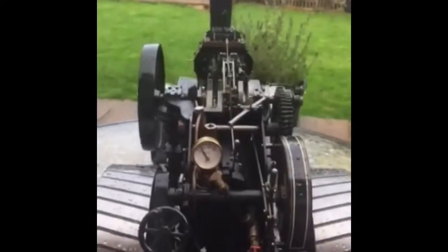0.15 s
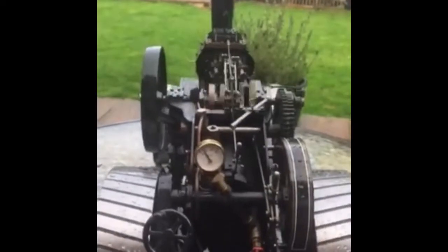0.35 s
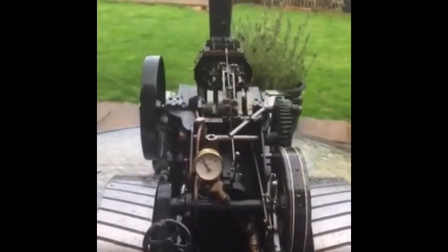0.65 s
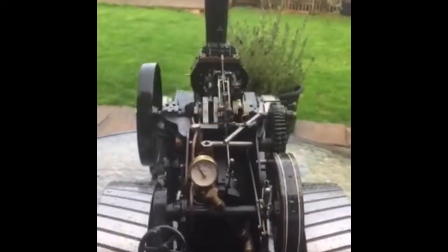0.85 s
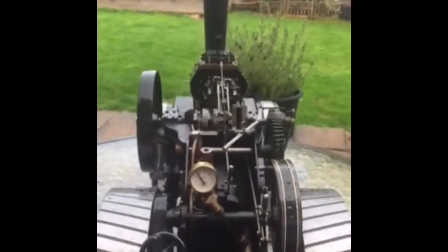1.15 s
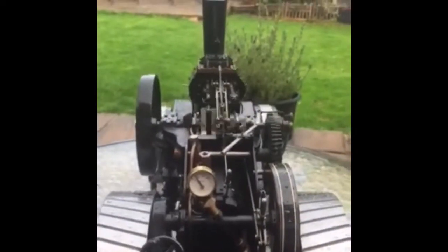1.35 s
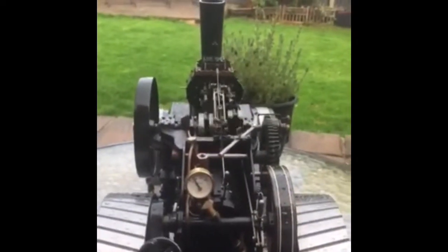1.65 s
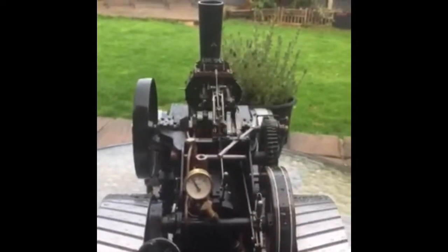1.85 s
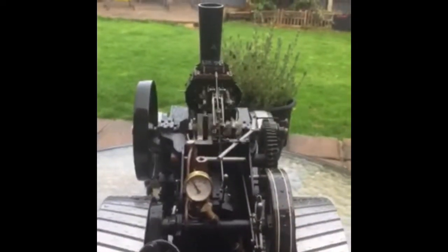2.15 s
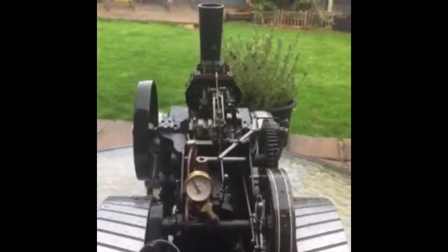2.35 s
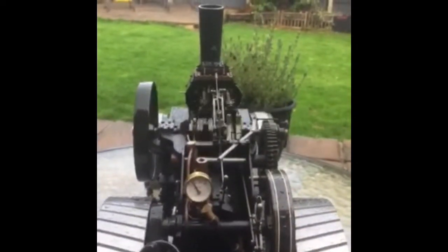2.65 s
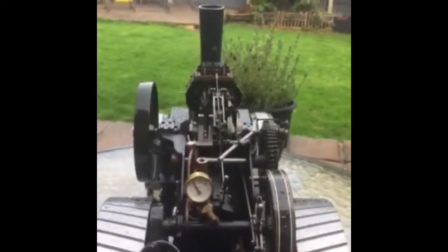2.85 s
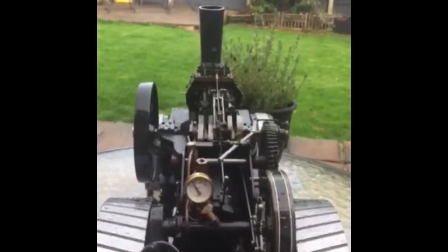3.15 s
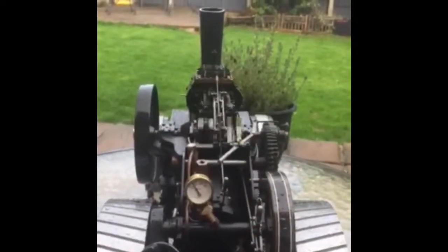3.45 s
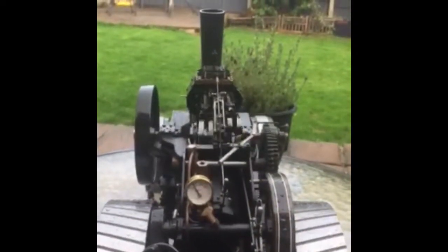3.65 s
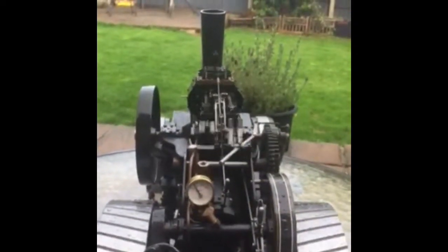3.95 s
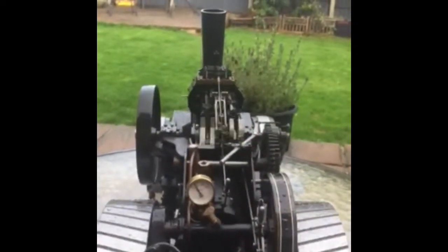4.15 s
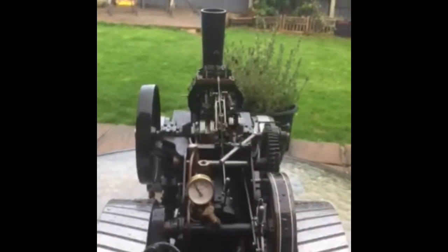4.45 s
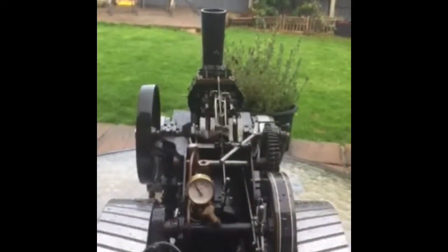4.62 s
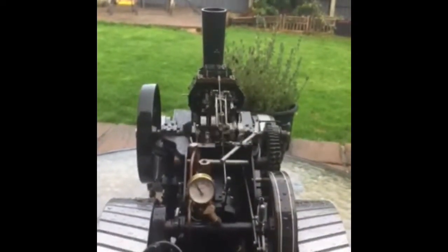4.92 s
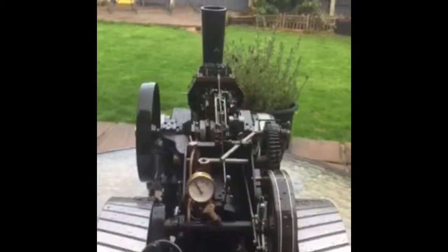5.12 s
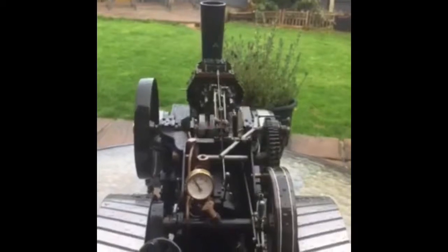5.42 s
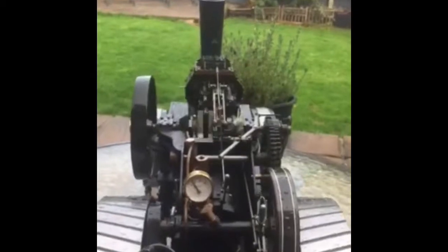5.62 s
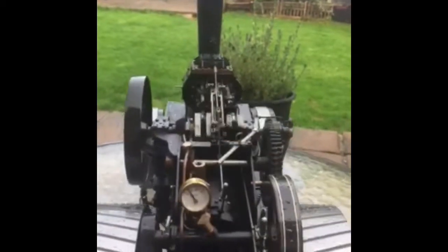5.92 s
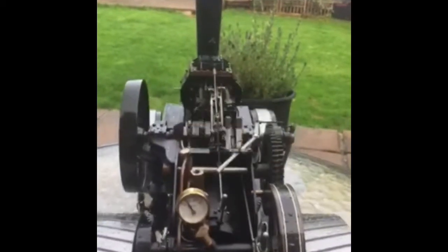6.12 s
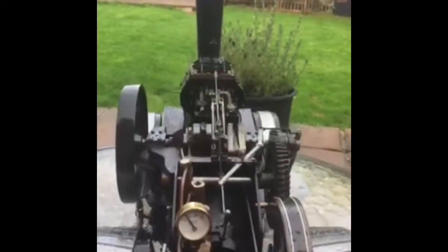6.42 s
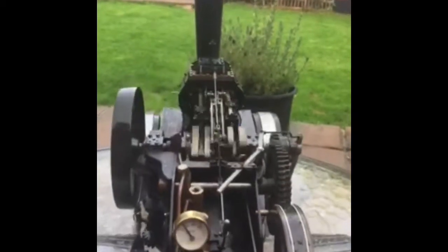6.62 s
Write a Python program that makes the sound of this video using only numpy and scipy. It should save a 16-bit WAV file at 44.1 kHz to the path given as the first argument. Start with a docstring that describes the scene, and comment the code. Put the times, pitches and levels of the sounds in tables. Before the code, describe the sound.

A small live-steam engine ticks over outdoors, hissing and knocking almost four times a second, then steam rushes out louder and slowly eases.

```python
"""A model traction engine ticks over on a garden table, close to a mono microphone.
Throughout: noise puffs in chimney resonances, a struck-mode knock per turn, rubbed frame, hiss, sizzle.
From the start: a swelling sine drone, soft low bumps and spits of hot water (snap, fizz, short rings).
0.77 s: the steam valve lifts briefly; 0.93 s: again, and the resonant noise jet slowly eases.
From 2.2 s: loose gear rattles as filtered clicks; from 2.8 s: three short spurts of wet steam."""
import sys
import numpy as np
from scipy import signal
from scipy.fft import rfft, irfft
from scipy.io import wavfile

SR = 44100
rng = np.random.default_rng(int(sys.argv[2]) if len(sys.argv) > 2 else 0)


def dump_mix(stems):
    """Bounce the given channels to the path in sys.argv[1] as a 16-bit WAV at rate SR."""
    frames = np.atleast_2d(stems).T  # one column per channel
    limited = np.clip(frames, -1, 1)  # hard clip at full scale
    pcm = np.round(limited * 32767).astype(np.int16)
    wavfile.write(sys.argv[1], SR, pcm)


N = 298998
TIME_S = np.arange(N) / SR
FREQ_HZ = np.fft.rfftfreq(N, 1 / SR)
BURST_N = SR // 5  # samples in a short sound

# crank, near 3.7 turns/s with two brief spurts of speed; knocks at whole turns: t/s, angle/turns
CRANK = [(0, .49), (.414, 2), (.98, 4), (1.229, 5), (2.022, 8), (3.398, 13), (3.874, 15), (4.943, 19),
         (6.037, 23), (6.78, 25.67)]
# exhaust puffs in each turn: place after knock/turns, width/turns, relative level/dB
PUFFS = [(0.15, 0.071, -9), (0.55, 0.039, -6), (0.88, 0.058, -4), (0.013, 0.022, -6.5)]
# chimney air column: f/Hz, width/Hz, relative level/dB
CHIMNEY = [(153.1, 9.2, 4), (175.6, 19, -9), (196, 21, -25.5)]
# knock modes: nominal f/Hz, t60/s, relative level/dB
KNOCK_MODES = [(322.8, 0.13, -2.5), (376, 0.02, 1.5), (422, 0.04, -22), (552, 0.097, -13.5)]
# sliding of crosshead and valve gear: place after knock/turns, width/turns, relative level/dB
SLIDES = [(.09, 0.13, -1.5), (.4, 0.052, -5.5), (0.521, 0.029, 1), (0.821, 0.033, 3.5), (.94, 0.041, -9)]
# frame and boiler shell: f/Hz, width/Hz, relative level/dB
FRAME = [(251, 16, -2.5), (323, 21, 7), (362, 47, 1), (429.3, 17.4, 2.5), (578, 25, -7.5), (710, 210, -13),
         (931, 49, -3), (974, 75, -5), (1140, 390, -11)]
# rods singing on every turn: place after knock/turns, width/turns, f/Hz, level/dB
SINGS = [(0.887, 0.086, 574, -55), (0.035, 0.029, 574, -53.5), (0.079, 0.077, 824, -56.5)]
# loose gear: t/s, blow level before colouring/dB
RATTLES = [(2.194, -5), (2.705, -7), (4.539, -3), (4.792, 0.5), (4.843, -1), (5.596, 2.5), (5.936, -4),
           (6.035, 0), (6.045, -1), (6.051, 1), (6.058, -2), (6.303, 3.5), (6.431, -2.5)]
# rattle spectrum: f/Hz, relative density level/dB
RATTLE_COLOUR = [(90, -13), (200, -4.5), (420, -16), (560, -4.5), (720, 1), (900, -10.5), (1300, -6),
                 (2500, -16), (6000, -19), (14000, -45)]
# valve lifts: t/s, rush rise/dB, attack/s, release time constant/s
LIFTS = [(0.77, 9.5, 0.037, 0.12), (0.93, 11, 0.038, 2.78)]
# jet's hollow tone, also drives the chimney hum: t/s, level before trim/dB
TONE_LEVEL = [(0.0, -45.5), (0.47, -42), (0.75, -46.5), (0.81, -37), (0.92, -45.5), (0.96, -29.5),
              (1.02, -41), (1.09, -32), (1.17, -39), (1.85, -36), (1.87, -28), (1.93, -35.5), (3.12, -39),
              (3.7, -36.5), (3.78, -47), (3.83, -39), (6.7, -49), (6.78, -45)]
# hollow tone in the chimney mouth: f/Hz, width/Hz, relative level/dB
JET_TONE = [(1153, 57, -23), (1246, 140, -8.5), (1329, 34, -1.5), (1357.5, 41, 0.5), (1410, 46, -8.5)]
# higher jet resonances: f/Hz, width/Hz, relative level/dB
JET_MODES = [(1750, 84, -12), (1924, 264, -6.5), (2530, 11, 3.5), (2655, 118, 3), (2864, 335, -2.5),
             (3170, 450, -11), (3585, 130, -6.5), (3767, 176, 0.5), (4350, 190, -8), (5450, 270, -9.5),
             (6700, 1400, -17.5)]
# sizzle at glands and drain cocks: f/Hz, width/Hz, relative level/dB
SIZZLE = [(4230, 300, 2.5), (5470, 240, 5), (5850, 180, 3.5), (6430, 220, 3.5), (7060, 410, 3),
          (8130, 290, 2), (8530, 490, -1), (9600, 810, -2), (11000, 420, 2), (11970, 580, -0.5),
          (13200, 700, -5), (15300, 700, -5.5)]
# steam leak and garden air: f/Hz, relative density level/dB
HISS = [(25, -34), (60, 3), (110, 6.5), (230, 4), (400, 9), (520, 1), (700, 1), (1050, 0.5), (1650, -3),
        (4800, -0.5), (7700, -5), (9000, -1.5), (14000, -4.5), (15500, -2)]
# hot-water spits: t/s, level before high-pass/dB, low ring f/Hz, high ring f/Hz,
# high ring relative level/dB, snap relative level/dB, ring t60/s
SPITS = [(0.126, -32, 2500, 2900, -8, -30, .008), (0.2863, -27.5, 2270, 2600, -15, -22, .009),
         (0.5954, -27.5, 4470, 11800, 3, 13, 0.007), (0.7768, -24.5, 1360, 3750, -1, 1, 0.009),
         (4.8327, -9.5, 3230, 9000, -5, -19, 0.0029), (5.539, -8.5, 3500, 5950, -5, 9, 0.0034),
         (6.174, -30, 2690, 2850, -18, -17, 0.025)]
# wet-steam spurts: t/s, peak level/dB, f/Hz, bell width (sigma)/s
SPURTS = [(2.829, -34, 6200, 0.0027), (2.845, -45, 6260, .014), (3.327, -42, 6200, 0.0043)]
# drone: t/s, level before trim/dB
DRONE_LEVEL = [(0.0, -67), (0.19, -74), (0.55, -52), (0.79, -62), (0.87, -52), (1.34, -49.5), (1.6, -61),
               (1.91, -49.5), (3.25, -70), (3.63, -52), (4.12, -48), (4.27, -57), (4.49, -45),
               (5.38, -42.5), (5.91, -54), (6.14, -43.5), (6.78, -39)]
# low bumps on the microphone: t/s, peak level/dB, f/Hz, bell width (sigma)/s
BUMPS = [(0.018, -44, 178, .014), (0.347, -43, 140, 0.011), (.36, -46, 60, 0.019), (1.054, -51, 60, .02),
         (1.457, -50, 55, .018), (2.54, -48, 58, 0.034), (6.047, -39.5, 190, 0.014)]

# the pull holds the bearing tight: softer knock per turn/s above idle
IDLE_TURNS_PER_S, KNOCK_DB, KNOCK_SOFTEN_DB_PER_TURN_PER_S = 3.8, -29.5, 17
RUSH_SHUT_DB, HISS_DB = -47.5, -45
DRONE_START_HZ, DRONE_SAG_HZ_PER_S = 99.7, 0.58
TOP_HZ = 15700


def undb(db):
    """Decibels to gain."""
    return 10 ** (np.asarray(db) / 20)


def unit(x):
    """Scale to rms 1."""
    return x / np.sqrt(np.mean(x ** 2))


def noise():
    """White noise, full length."""
    return rng.standard_normal(N)


def curves(table):
    """Table columns interpolated linearly in time."""
    t_s, *columns = np.transpose(table)
    return [np.interp(TIME_S, t_s, column) for column in columns]


def walk(rate_hz):
    """Random levels joined by lines, rms 1."""
    points = rng.standard_normal(2048)
    return unit(np.interp(TIME_S * rate_hz, np.arange(len(points)), points))


def colour(x, points):
    """Minimum-phase filter with a (Hz, dB) outline, made by folding the cepstrum."""
    hz, db = np.transpose(points)
    outline_db = np.interp(np.log(FREQ_HZ + 1), np.log(hz), db)
    cepstrum = irfft(np.log(undb(outline_db)), N)
    cepstrum[1:N // 2] *= 2
    cepstrum[N // 2 + 1:] = 0
    return irfft(rfft(x) * np.exp(rfft(cepstrum)), N)


def resonate(x, modes, steep):
    """Zero-phase (Hz, width Hz, dB) resonances; steep sets how fast the skirts fall."""
    power = 0
    for hz, width_hz, db in modes:
        detune = (FREQ_HZ ** 2 - hz ** 2) / (width_hz * (FREQ_HZ + 1))
        power = power + undb(db) ** 2 / (1 + detune ** 2 / steep) ** steep
    return irfft(rfft(x) * np.sqrt(power), N)


def even_out(x, softness):
    """Divide a narrow band by its envelope for near-steady strength; rms 1."""
    envelope = np.abs(signal.hilbert(unit(x)))
    return unit(x / (envelope + softness))


def fade(t60_s):
    """Exponential decay over a fifth of a second."""
    return np.exp(-np.log(1000) * TIME_S[:BURST_N] / t60_s)


def ring(hz, t60_s):
    """One struck mode: a decaying sine."""
    return fade(t60_s) * np.sin(2 * np.pi * hz * TIME_S[:BURST_N])


def add(out, t_s, sound):
    """Mix a short sound in at t_s."""
    start = max(int(t_s * SR), 0)
    out[start:start + len(sound)] += sound[:max(N - start, 0)]


def strokes(angle, table, rest_db):
    """Gain bells at fixed crank angles on every turn, over a resting gain."""
    gain = undb(rest_db)
    for place, width, db in table:
        offset = (angle - place + 0.5) % 1 - 0.5
        gain = gain + undb(db) * np.exp(-0.5 * (offset / width) ** 2)
    return gain


def swells(table):
    """Brief bell-shaped swells of band noise, each around its own pitch."""
    out = np.zeros(N)
    for t_s, db, hz, sigma_s in table:
        bell = np.exp(-0.5 * ((TIME_S - t_s) / sigma_s) ** 2)
        band = resonate(noise(), [(hz, hz / 2, 0)], steep=1.5)
        out += undb(db) * bell * even_out(band, softness=0.87)
    return out


def crank_angle():
    """Turns of the crank, whole at each knock."""
    return curves(CRANK)[0]


def exhaust(angle, puff_db=-41, draught_db=-17.5):
    """Spent steam puffs sound the chimney's air column; the jet's draught keeps it humming between."""
    jet_db, = curves(TONE_LEVEL)
    air = even_out(resonate(noise(), CHIMNEY, steep=2.1), softness=0.32)
    puffs = undb(puff_db) * air * strokes(angle, PUFFS, rest_db=-24.5)
    hum = even_out(resonate(noise(), CHIMNEY[:1], steep=3.0), softness=0.68)
    return puffs + hum * undb(jet_db + draught_db)


def knocks(angle, lead_s=0.002, scatter_db=0.6, scatter_ratio=0.0098):
    """Big-end play is taken up once a turn with an oil-softened blow; quick turns knock more softly."""
    out = np.zeros(N)
    times_s = TIME_S[1:][np.diff(np.floor(angle)) > 0]
    turns_per_s = 1 / np.diff(times_s, prepend=-np.inf)
    excess = np.maximum(turns_per_s - IDLE_TURNS_PER_S, 0)
    levels_db = KNOCK_DB - KNOCK_SOFTEN_DB_PER_TURN_PER_S * excess
    for t_s, db in zip(times_s, levels_db):
        for k, (hz, t60_s, mode_db) in enumerate(KNOCK_MODES):
            level_chance, pitch_chance = rng.standard_normal(2)
            # alternate signs: the knock takes a cycle to build
            size = (-1) ** k * undb(db + mode_db + scatter_db * level_chance)
            add(out, t_s - lead_s, size * ring(hz * (1 + scatter_ratio * pitch_chance), t60_s))
    return out


def motion(angle, rub_db=-50.5):
    """Sliding rods and meshing gears rub the frame into sound; rods sing at their own crank angles."""
    rub = noise() * strokes(angle, SLIDES, rest_db=-13)
    out = undb(rub_db) * unit(resonate(rub, FRAME, steep=2.4))
    for place, width, hz, db in SINGS:
        note = even_out(resonate(noise(), [(hz, 18, 0)], steep=2.3), softness=0.96)
        out += undb(db) * note * strokes(angle, [(place, width, 0)], rest_db=-12)
    return out


def rattles(t60_s=0.027, chatter_db=-21):
    """Dull clacks of loose gear: one blow and a short noise chatter, coloured."""
    out = np.zeros(N)
    for t_s, db in RATTLES:
        clack = undb(chatter_db) * rng.standard_normal(BURST_N) * fade(t60_s)
        clack[0] += 1
        add(out, t_s, undb(db) * clack)
    return colour(out, RATTLE_COLOUR)


def valve():
    """Rush rise in dB: quick attack at each lift, exponential release as the pressure falls."""
    rise_db = np.zeros(N)
    for t_s, db, attack_s, release_s in LIFTS:
        since_s = TIME_S - t_s
        attack = np.clip(since_s / attack_s, 0, 1)
        rise_db += db * attack * np.exp(-np.maximum(since_s, 0) / release_s)
    return rise_db


def steam(tone_trim_db=0.1, sizzle_db=-48):
    """A wet jet flutters in the chimney's resonances; glands sizzle along with it, over a smooth leak."""
    swell_db, = curves(TONE_LEVEL)
    rush_db = RUSH_SHUT_DB + valve()
    flutter_db = 0.59 * walk(40)  # shared by tone and rush
    tone_db = tone_trim_db + swell_db + flutter_db + 1.16 * walk(25)
    tone = unit(resonate(noise(), JET_TONE, steep=1.94)) * undb(tone_db)
    rush_gain = undb(rush_db + flutter_db + 1.24 * walk(300))
    rush = unit(resonate(noise(), JET_MODES, steep=1.56)) * rush_gain
    follow_db = 0.58 * (rush_db - rush_db.mean())
    sizzle_gain = undb(sizzle_db + follow_db + 0.93 * walk(60))
    sizzle = unit(resonate(noise(), SIZZLE, steep=1.6)) * sizzle_gain
    leak = unit(colour(noise(), HISS)) * undb(HISS_DB + 1.3 * walk(30))
    return tone + rush + sizzle + leak


def spits(fizz_db=-21, fizz_t60_s=0.032):
    """Drops burst on hot metal: a snap, a brief fizz and two very short rings."""
    out = np.zeros(N)
    for t_s, db, low_hz, high_hz, high_db, snap_db, t60_s in SPITS:
        snap = undb(fizz_db) * rng.standard_normal(BURST_N) * fade(fizz_t60_s)
        snap[1] += 1
        snap[3] -= 0.6
        rings = ring(low_hz, t60_s) + undb(high_db) * ring(high_hz, t60_s)
        add(out, t_s, undb(db) * (rings + undb(snap_db) * snap))
    # a drop is too small to radiate bass
    high_pass = signal.butter(4, 1100, "high", fs=SR, output="sos")
    return signal.sosfilt(high_pass, out)


def spurts():
    """Wet steam escapes in short bursts of high band noise."""
    return swells(SPURTS)


def drone(hum_trim_db=0.1, under_hz=78, under_db=-65):
    """Low hum, as of a distant motor, swelling and sagging in pitch; a fainter wavering tone under it."""
    db, = curves(DRONE_LEVEL)
    hum_hz = DRONE_START_HZ - DRONE_SAG_HZ_PER_S * TIME_S + 0.27 * walk(5.7)
    hum_gain = undb(hum_trim_db + db + 0.91 * walk(7))
    hum = hum_gain * np.sin(2 * np.pi * np.cumsum(hum_hz) / SR)
    # lower tone follows the hum's swell by half, in dB
    waver_db = 0.5 * (db - db.mean()) + 2.5 * walk(5)
    under_phase = 2 * np.pi * np.cumsum(under_hz + 2.23 * walk(4)) / SR
    under = undb(under_db + waver_db) * np.sin(under_phase)
    return np.sqrt(2) * (hum + under)  # levels are rms


def bumps():
    """Soft bumps on the microphone: short swells of low band noise."""
    return swells(BUMPS)


def scene():
    """All sources in the open air, the same on both channels."""
    angle = crank_angle()
    engine = exhaust(angle) + knocks(angle) + motion(angle) + rattles()
    mono = engine + steam() + spits() + spurts() + drone() + bumps()
    return np.array([mono, mono])


def record(dry):
    """The recorder cuts the top steeply: elliptic low-pass."""
    low_pass = signal.ellip(10, 0.1, 80, TOP_HZ, fs=SR, output="sos")
    return signal.sosfilt(low_pass, dry)


dry = scene()
out = record(dry)
dump_mix(out)
```